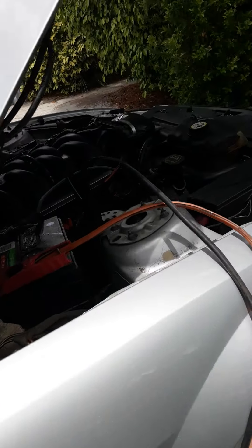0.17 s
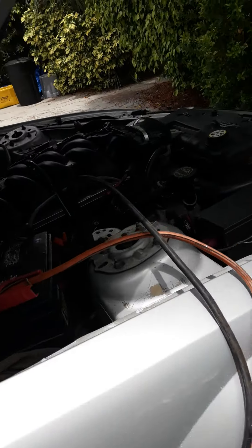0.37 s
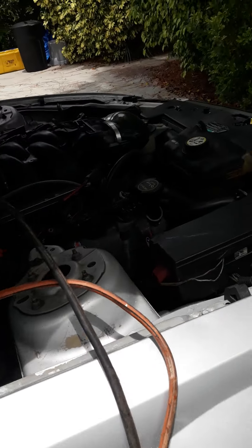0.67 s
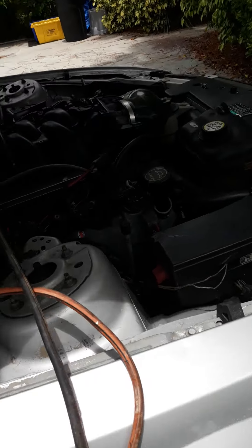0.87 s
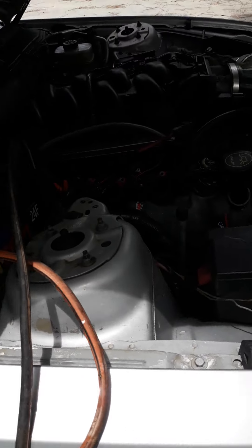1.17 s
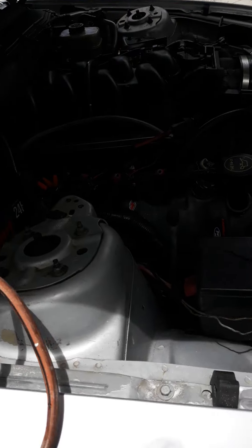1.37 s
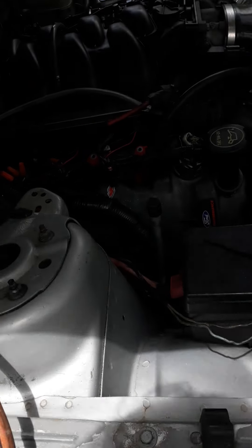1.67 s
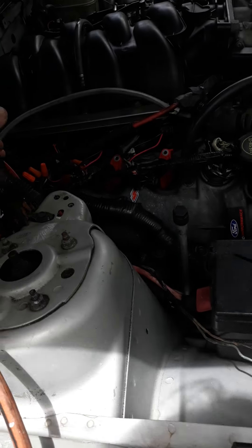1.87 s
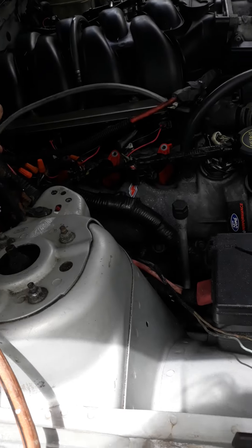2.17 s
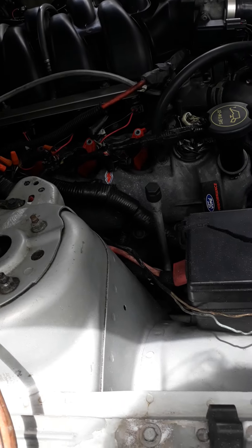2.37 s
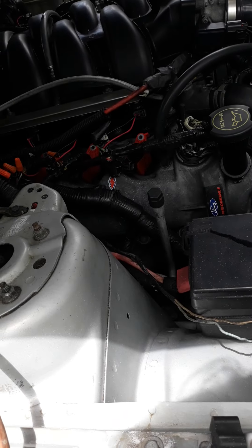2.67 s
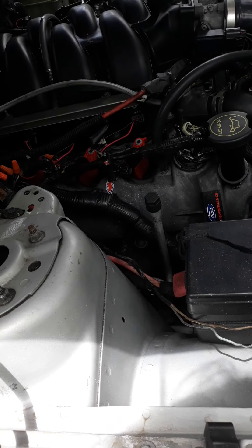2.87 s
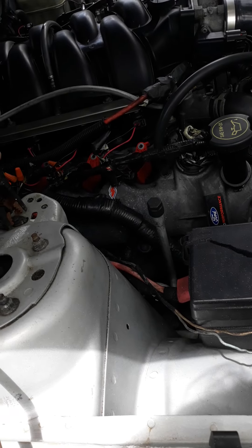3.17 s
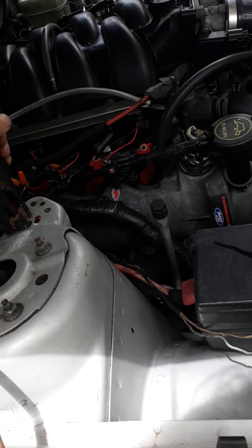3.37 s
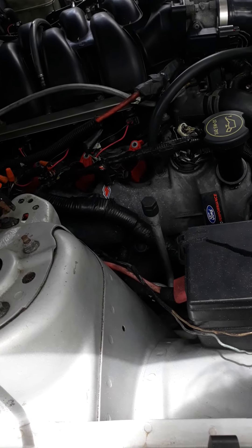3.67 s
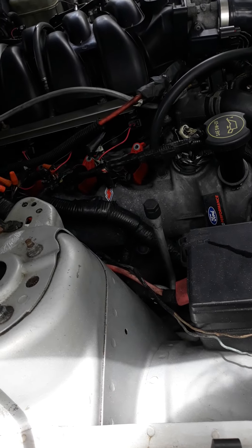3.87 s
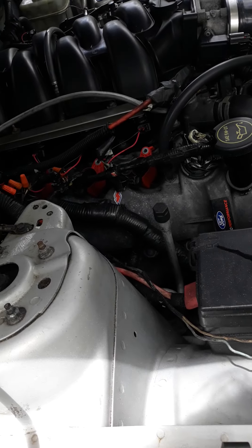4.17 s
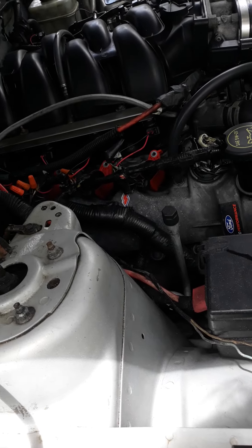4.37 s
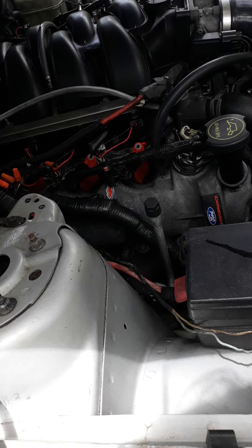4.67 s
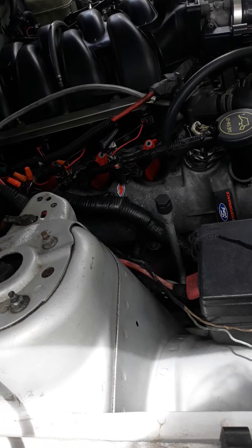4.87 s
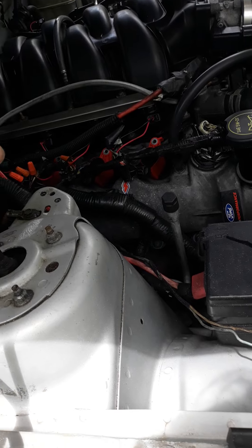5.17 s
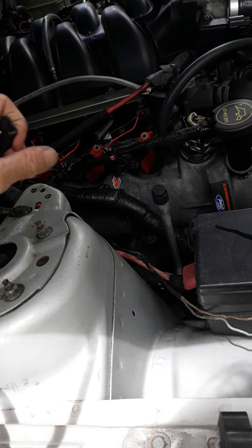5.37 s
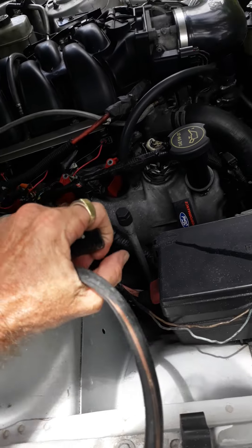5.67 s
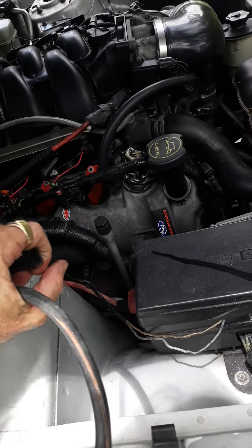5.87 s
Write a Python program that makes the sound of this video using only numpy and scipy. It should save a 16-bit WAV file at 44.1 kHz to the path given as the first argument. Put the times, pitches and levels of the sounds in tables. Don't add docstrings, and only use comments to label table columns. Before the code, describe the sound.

Close stereo pickup of a lumpy idle at about 720 rpm: deep burbling exhaust, fast dry ticks, steady hiss, faint pulley whine and a thin unsteady air whistle. Small rattles and cable brushes come mostly in the first second. After a long steady stretch, a bright, very dry metal snap bursts out with a tiny bounce; the engine then ducks markedly and rises again near the end.

```python
import sys
import numpy as np
from scipy import signal
from scipy.fft import rfft, irfft, next_fast_len
from scipy.io import wavfile
from scipy.ndimage import map_coordinates

SR = 44100
rng = np.random.default_rng(int(sys.argv[2]) if len(sys.argv) > 2 else 0)


def int16_out(signal):
    q = np.round(np.clip(np.atleast_2d(signal).T, -1, 1) * 32767)
    wavfile.write(sys.argv[1], SR, q.astype(np.int16))


def volts(x):
    e = np.asarray(x, float) / 20
    return 10 ** e


N = 264908
LEAD_IN = SR // 2


def unit(x):
    return x / np.sqrt(np.mean(x ** 2) + 1e-20)


def along(points, hz):
    f, value = np.transpose(points)
    return np.interp(np.log(hz + 1), np.log(f + 1), value)


def colour(points):
    return lambda hz: volts(along(points, hz))


def wobble(rate):
    knots = rng.standard_normal(int(N * rate / SR) + 4)
    return map_coordinates(knots, [np.arange(N) * rate / SR])


def filtered(x, response):
    m = next_fast_len(x.shape[-1] + SR // 3)
    spectrum = rfft(x, m) * response(np.fft.rfftfreq(m, 1 / SR))
    return irfft(spectrum, m)[..., :x.shape[-1]]


def ringing(modes):
    def response(f):
        return sum(sign * volts(db) * 1j * f * width / (centre ** 2 - f * f + 1j * f * width)
                   for centre, width, db, sign in modes)
    return response


# f/Hz, likeness [0 to 1]
PORT_LIKENESS = [(60, 0.11), (250, 0.6), (500, 0.87), (1000, 0.21), (2000, 0.23), (5000, 0.17),
                 (16000, 0.077)]


def noise(response, like=1.0):
    def mid_side(hz):
        turn = np.arccos(np.clip(along(PORT_LIKENESS, hz) ** like, 0, 1)) / 2
        return response(hz) * [np.cos(turn), np.sin(turn)]
    mid, side = filtered(rng.standard_normal((2, N)), mid_side)
    return unit(np.array([mid + side, mid - side]))


def bursts(rows):
    out, t = np.zeros(N + SR), np.arange(SR // 3) / SR
    for start, db, t60 in rows:
        out[round(start * SR):][:len(t)] += volts(db - 60 * t / t60)
    return out[:N]


def nearness():
    swing_s, knee = 1.0, 12
    swing = np.arange(N) / SR / swing_s + 1e-6
    return np.clip(swing / (1 + swing ** knee) ** (1 / knee), 0, 1)


# t/s, crank speed [rpm]
IDLE_SPEED = [(0.0, 718.3), (0.41, 711.2), (0.76, 722.1), (2.36, 716.0), (2.43, 705.0), (2.51, 721.4),
              (3.44, 725.9), (3.52, 716.1), (4.12, 730.2), (4.43, 715.7), (4.5, 720.1), (5.38, 714.4),
              (5.45, 691.1), (5.65, 746.0), (5.75, 709.4), (6.01, 729.8)]


def cycles():
    rpm = np.interp(np.arange(N) / SR, *np.transpose(IDLE_SPEED))
    rpm = np.pad(rpm, (LEAD_IN, 0), "edge")
    start_cycle = -.0387
    return start_cycle + (np.cumsum(rpm) - rpm[0] * LEAD_IN) / (120 * SR)


def on_crank(cycle, degrees, db, scatter_db, jitter_ms):
    wanted = np.arange(-2, 40) + degrees / 720
    luck = rng.standard_normal((len(wanted), 2))
    at = np.interp(wanted, cycle, np.arange(len(cycle)), right=-SR)
    at = at + luck[:, 0] * jitter_ms * SR / 1000
    inside = (at >= 0) & (at < len(cycle))
    strength = volts(db + scatter_db * luck[inside, 1])
    return np.bincount(at[inside].astype(int), strength, len(cycle))


# crank angle [degrees], level/dB, exhaust bank [0 or 1]
FIRINGS = [(-38.0, -0.1, 1), (58.0, 3.2, 1), (152.8, 1.4, 0), (231.6, 3.7, 1), (331.6, 2.4, 0),
           (414.3, 0.5, 0), (501.3, -0.2, 1), (598.1, -0.4, 0)]
# f/Hz, width/Hz, level/dB, polarity
BANK_A_MODES = [(50.5, 9.0, -43.4, -1), (90.8, 20.7, -23.4, -1), (94.5, 12.9, -21.5, 1),
                (138.6, 9.0, -27.8, -1), (178.4, 85.9, -27.4, 1), (195.3, 20.2, -25.4, -1),
                (233.2, 49.8, -30.2, -1), (242.9, 9.0, -29.6, 1), (268.0, 9.0, -42.0, 1),
                (303.8, 9.0, -41.5, -1), (309.7, 9.0, -44.3, 1), (337.7, 9.0, -45.4, 1),
                (349.3, 19.4, -34.8, -1), (353.5, 9.0, -33.1, 1)]
BANK_B_MODES = [(99.2, 133.3, -19.2, -1), (118.0, 179.6, -18.3, 1), (133.2, 11.6, -21.7, -1),
                (157.2, 9.0, -24.5, 1), (173.0, 9.0, -28.8, -1), (198.8, 9.0, -27.8, -1),
                (237.5, 27.1, -34.7, 1), (239.3, 90.1, -30.0, -1), (364.6, 9.0, -50.8, 1),
                (365.5, 196.2, -40.9, -1)]
# f/Hz, level/dB
EXHAUST_COLOUR = [(40, -.7), (100, -1.2), (150, -.7), (200, -.5), (238, -.5), (268, 5), (310, 2.5),
                  (356, 5), (400, -1), (450, -14), (700, -45)]
# f/Hz, density [dB per Hz]
GAS_FLUTTER = [(25, -50), (60, -19), (90, -14), (115, -7), (142, 0), (175, -7), (205, -11), (262, -7),
               (290, -15), (330, -15), (372, -9), (410, -17), (460, -34), (600, -120)]


def exhaust(cycle):
    banks = np.zeros((2, len(cycle)))
    for degrees, db, bank in FIRINGS:
        banks[int(bank)] += on_crank(cycle, degrees, db, scatter_db=1.1, jitter_ms=.08)
    banks = banks * misfires(len(cycle))
    beat = filtered(banks[0], ringing(BANK_A_MODES)) + filtered(banks[1], ringing(BANK_B_MODES))
    beat = filtered(beat * SR / 12, colour(EXHAUST_COLOUR))[LEAD_IN:]
    boom = filtered(beat, colour([(55, -4.0), (75, -64)]))
    beat = beat + (1 - nearness()) * boom
    flutter = volts(-18) * noise(colour(GAS_FLUTTER), like=2.5)
    return volts(9.5) * beat + flutter


# crank angle [degrees], level/dB
COVER_DRIVE = [(0, 4.5), (70, -6), (120, 2.5), (230, -1), (290, 2.5), (490, -0.5), (545, 2), (612, -0.5),
               (720, -1.5)]
# f/Hz, width/Hz, level/dB, polarity
COVER_MODES = [(518, 26, 2.5, 1), (673, 17, -8.5, 1), (789, 18, -13, 1), (905, 24, -13.5, 1),
               (1213, 28, -11, -1), (1440, 34, -12.5, 1), (1660, 42, -10, -1), (1790, 60, -14, 1)]
# f/Hz, level/dB
COVER_COLOUR = [(420, -8), (470, -4), (520, 0), (565, -5), (640, -1), (700, 0)]
# f/Hz, density [dB per Hz]
BLOCK_ABOVE = [(300, -120), (400, 3), (460, -14), (600, -20.5), (850, -17), (1100, -13.5), (1350, -9.5),
               (1750, -13.5), (2100, -23), (2800, -120)]
# f/Hz, density [dB per Hz]
BLOCK_ASIDE = [(240, -29), (400, -0.5), (484, -22), (567, -2.5), (630, -2.5), (754, -6.5), (962, -13),
               (1600, -11), (1740, -13), (2890, -17.5), (5000, -24), (6500, -57), (11000, -120)]


def block(cycle):
    crank_degrees = cycle[LEAD_IN:] % 1 * 720
    drive = volts(1.1 * np.interp(crank_degrees, *np.transpose(COVER_DRIVE)))
    covers = unit(drive * noise(lambda hz: ringing(COVER_MODES)(hz) * colour(COVER_COLOUR)(hz)))
    above = unit(volts(.8 * wobble(14)) * noise(colour(BLOCK_ABOVE)) + volts(2.5) * covers)
    aside = volts(.4 + 1.5 * wobble(25)) * noise(colour(BLOCK_ASIDE))
    near = nearness()
    return np.sqrt(near) * above + np.sqrt(1 - near) * aside


# crank angle [degrees], fizz level/dB, clack above fizz [dB]
TICKS = [(32, -40.4, -0.7), (122, -50.6, 5.7), (150, -54.1, 3.9), (219, -45.7, 0.9), (266, -43.5, -2.7),
         (298, -35.8, -4.8), (397, -47.1, 4.9), (448, -44.9, 1.8), (480, -39.5, -1.5), (534, -41.6, -3.5),
         (570, -41.7, 2.5), (673, -50.0, 5.4), (695, -54.1, 2.1), (716, -40.8, 1.8)]
# f/Hz, density [dB per Hz]
RUSH_COLOUR = [(1300, -63), (1900, 0), (2800, 0.5), (3300, -3), (4000, -0.5), (5300, -7), (7200, -5),
               (8600, -21.5), (10000, -18.5), (13400, -14.5), (15500, -17), (16500, -41)]
# f/Hz, density [dB per Hz]
FIZZ_COLOUR = [(7000, -120), (8300, -12), (11000, -12), (13000, -9), (14500, -3.5), (15600, 0), (16500, 0)]
# f/Hz, density [dB per Hz]
CLACK_COLOUR = [(1500, -120), (2500, 2), (5000, -8), (7200, -2), (8200, -8), (9000, -120)]


def valve_train(cycle, rush_db, tick_db):
    t = np.arange(SR // 40) / SR
    puff = (1 - np.exp(-t / .0009)) * volts(-60 * t / .013)
    fizz, clack = np.zeros((2, len(cycle)))
    for degrees, db, more_db in TICKS:
        fizz += on_crank(cycle, degrees - 5, db, scatter_db=1.6, jitter_ms=.25)
        clack += on_crank(cycle, degrees - 5, db + more_db, scatter_db=2.5, jitter_ms=.4)
    fizz, clack = (unit(signal.fftconvolve(hits, puff)[LEAD_IN:][:N]) for hits in (fizz, clack))
    rush = volts(rush_db + 0.98 + .6 * wobble(17)) * noise(colour(RUSH_COLOUR))
    ticks = volts(tick_db) * fizz * noise(colour(FIZZ_COLOUR))
    clacks = volts(rush_db - 7.5) * clack * noise(colour(CLACK_COLOUR))
    return rush + ticks + clacks


# f/Hz at 720 rpm, level/dB under the block, sway to either side [Hz]
PULLEY_WHINES = [
    (1670, -13, 28),
    (1195, -18, 20),
]


def pulleys(cycle):
    turn = cycle[LEAD_IN:]
    whines = 0
    for hz, db, sway_hz in PULLEY_WHINES:
        per_cycle = hz / 6
        sway = sway_hz / 6 * np.sin(2 * np.pi * turn)
        drift = 2 * np.pi * np.cumsum(sway_hz * wobble(9)) / SR
        whines = whines + volts(db + 3 * wobble(12)) * np.sin(2 * np.pi * per_cycle * turn + sway + drift)
    return nearness() * whines


# t/s, f/Hz, level/dB, t60/s
LOOSE_PARTS = [(.005, 2300, -32, .06), (.065, 2300, -32, .06), (.07, 4000, -35, .05), (.09, 3000, -34, .06),
               (.255, 3650, -33, .06), (.59, 1650, -31, .2), (.655, 3600, -35, .05), (.75, 1450, -32, .4),
               (.79, 3450, -35, .05), (1.095, 5100, -36, .06), (2.095, 3700, -35, .1),
               (2.395, 3900, -35, .08)]


def rattles():
    out, t = np.zeros(N + SR), np.arange(SR // 3) / SR
    for start, hz, db, t60 in LOOSE_PARTS:
        envelope = volts(db - 60 * t / t60) * (1 - np.exp(-t / 0.0013))
        out[round(start * SR):][:len(t)] += envelope * np.sin(2 * np.pi * hz * t)
    return out[:N]


# t/s, level/dB, t60/s
CABLE_RAPS = [
    (.385, -33.5, .12),
    (.555, -31.5, .14),
    (1.055, -34, .1),
    (1.1, -34, .08),
    (4.93, -41, .1),
]


def cable_raps():
    return bursts(CABLE_RAPS) * noise(colour(CLACK_COLOUR))


# t/s, level/dB
POOR_FIRINGS = [(.396, -5), (2.443, -8), (3.981, -5), (5.441, -11), (5.462, -6), (5.485, -6), (5.669, -8)]


def misfires(size):
    t = (np.arange(size) - LEAD_IN) / SR
    reach_s = .008
    return volts(sum(db * (np.abs(t - at) < reach_s) for at, db in POOR_FIRINGS))


# start t/s, length/s, f/Hz, level/dB under the rush
AIR_LEAKS = [(1.0, .5, 3980, -9), (1.5, .9, 3870, -13), (2.45, .8, 4040, -12), (3.0, .7, 4030, -15),
             (3.9, .9, 4035, -11), (4.6, 1.6, 4030, -13)]


def whistle():
    t = np.arange(N) / SR
    drift = 2 * np.pi * np.cumsum(25 * wobble(60)) / SR
    spells = np.zeros(N)
    for start, length, hz, db in AIR_LEAKS:
        swell = np.abs(np.sin(np.pi * np.clip((t - start) / length, 0, 1))) ** .5
        spells += volts(db) * swell * np.sin(2 * np.pi * hz * t + drift)
    return volts(-2 + 2 * wobble(30)) * spells


# t/s, peak level/dB, t60/s
CLAMP_CONTACTS = [
    (4.5522, -13, .008),
    (4.5531, -11, .006),
    (4.5541, -11, .007),
    (4.5577, -10, .004),
    (4.575, -27, .01),
]
JAW_DRIVE = [0, 0, 2, -9, -3]
# f/Hz, width/Hz, level/dB
JAW_MODES = [(2700, 200, 0), (3550, 240, 3), (4900, 200, -3.5), (6200, 300, -8), (7100, 500, -9)]
# f/Hz, density [dB per Hz]
CRACK_COLOUR = [(700, -40), (1500, -5), (3300, 0), (7500, -5), (8500, -8), (15500, -8), (16500, -12)]
# f/Hz, density [dB per Hz]
BAY_TAIL = [(300, -41), (700, -1.5), (2000, -7), (4500, -8), (7500, -5), (8500, -14), (15500, -13),
            (16500, -42)]


def clamp():
    crack = bursts(CLAMP_CONTACTS) * noise(colour(CRACK_COLOUR), like=0.59)
    at, db, _ = np.transpose(CLAMP_CONTACTS)
    blows = np.bincount((at * SR).astype(int), volts(db + JAW_DRIVE), N)
    modes = [(hz, width, level, (-1) ** k) for k, (hz, width, level) in enumerate(JAW_MODES)]
    snap = volts(-5) * crack + volts(19.5) * filtered(blows, ringing(modes))
    bay = bursts([(4.555, -17.5, 0.12)]) * noise(colour(BAY_TAIL), like=1.4)
    return snap + bay


def ducking():
    t = np.arange(N) / SR
    duck_at_s, depth_db, fall_s = 4.57, -10.5, .23
    recover_at_s, recover_s, share_given_back = 5.75, 0.15, 0.72
    sunk = 1 - np.exp(-np.clip(t - duck_at_s, 0, None) / fall_s)
    recovered = np.clip((t - recover_at_s) / recover_s, 0, 1)
    return depth_db * sunk * (1 - share_given_back * recovered)


def scene():
    block_db, rush_db, tick_db = -20.5, -28.5, -33
    over_db, beside_db = -8, -2.5
    cycle = cycles()
    engine = exhaust(cycle) + volts(block_db) * (block(cycle) + pulleys(cycle))
    left, right = engine + valve_train(cycle, rush_db, tick_db)
    lead = 6
    engine = np.array([left, np.pad(right, (lead, 0), "edge")[:N]])
    level_db = over_db + beside_db * (1 - nearness()) + ducking()
    close_by = clamp() + cable_raps() + rattles()
    return volts(level_db) * (engine + volts(rush_db) * whistle()) + close_by


def top_cut(x):
    return signal.sosfilt(signal.butter(12, 16850, fs=SR, output="sos"), x)


# f/Hz, level/dB
LEFT_OVER_RIGHT = [(60, .4), (150, .7), (300, -.3), (600, -3.3), (1300, 3.8), (2500, 1), (5000, -3),
                   (9000, -.2), (15000, -.6)]


def record(dry):
    def ports(hz):
        tilt = along(LEFT_OVER_RIGHT, hz) / 2
        band_limit = volts(-np.clip(hz - 15850, 0, 2000) / 7)
        return volts([tilt, -tilt]) * band_limit
    x = filtered(dry, ports)
    x = x / (1 + np.abs(x / .99) ** 8) ** (1 / 8)
    return top_cut(x)


dry = scene()
out = record(dry)
int16_out(out)
```